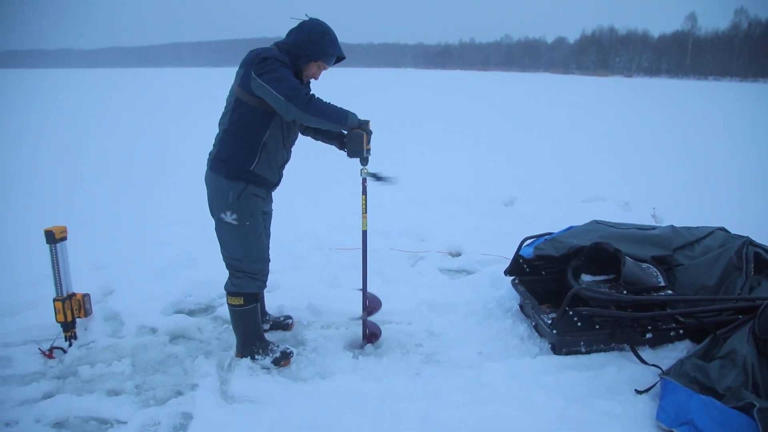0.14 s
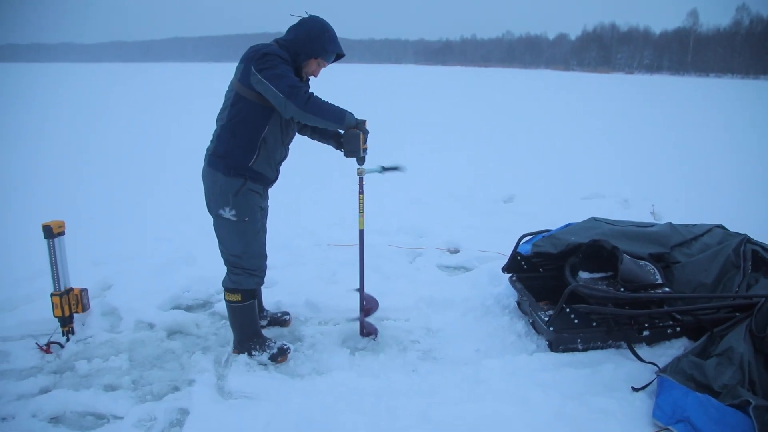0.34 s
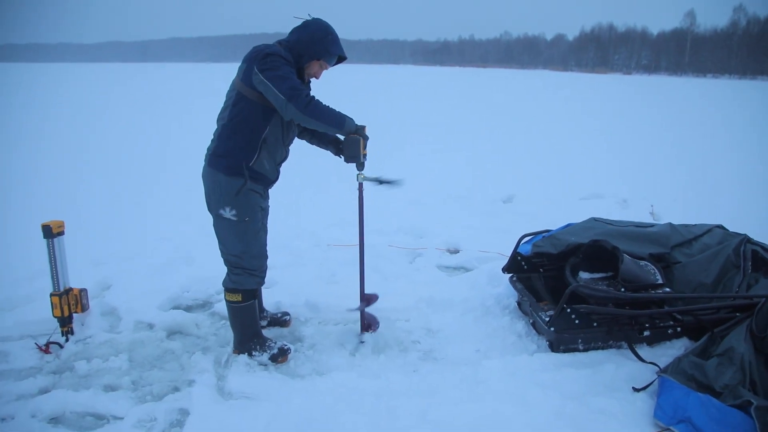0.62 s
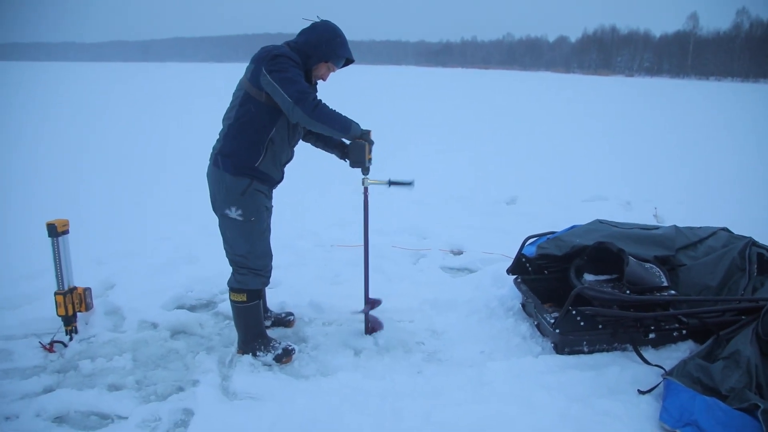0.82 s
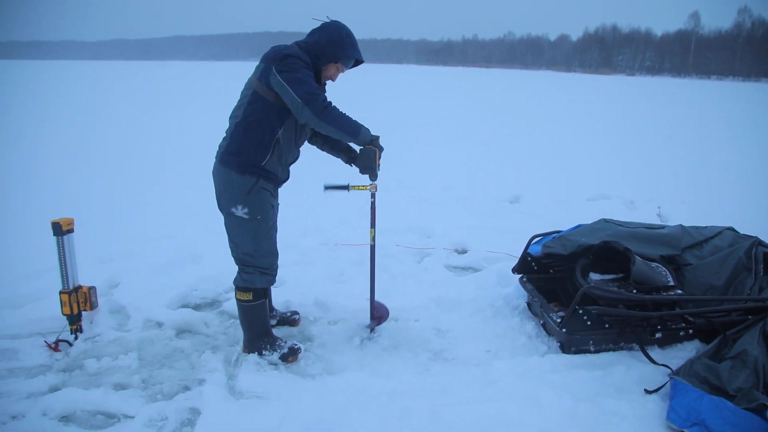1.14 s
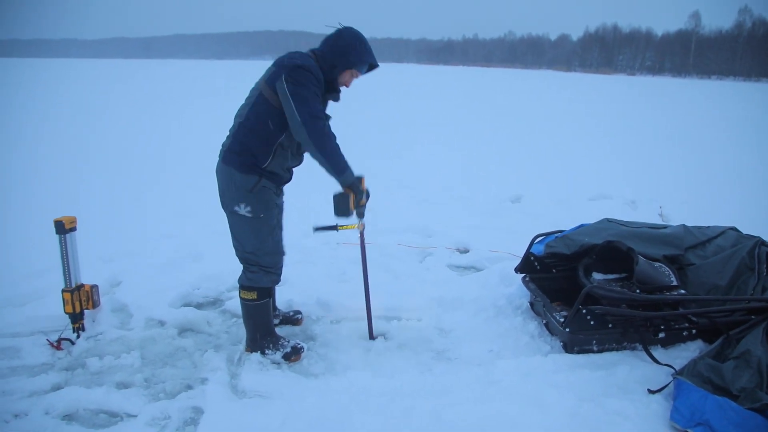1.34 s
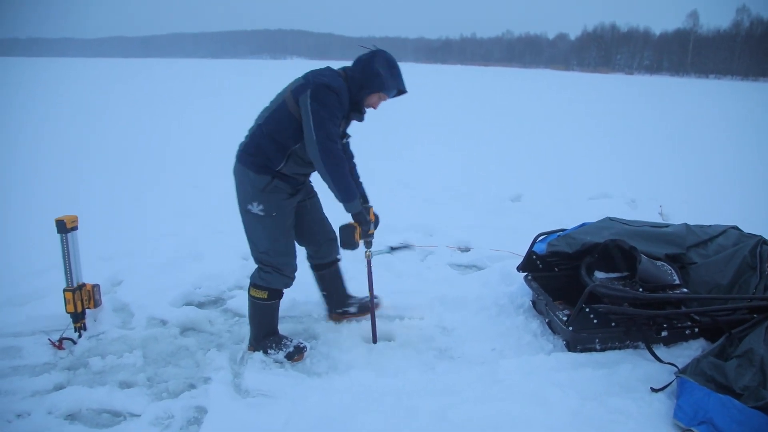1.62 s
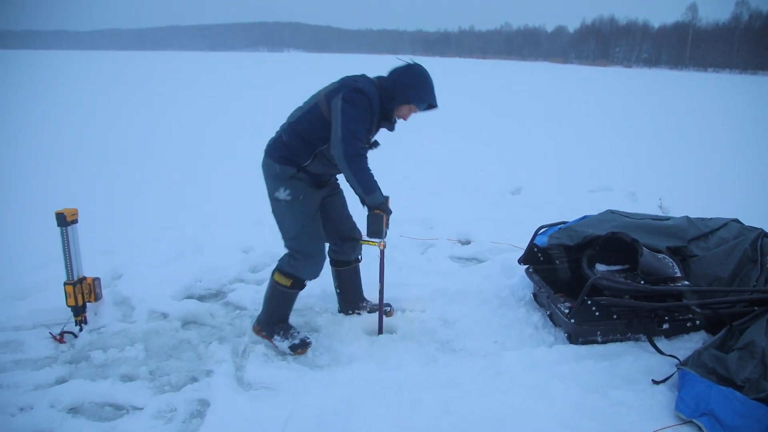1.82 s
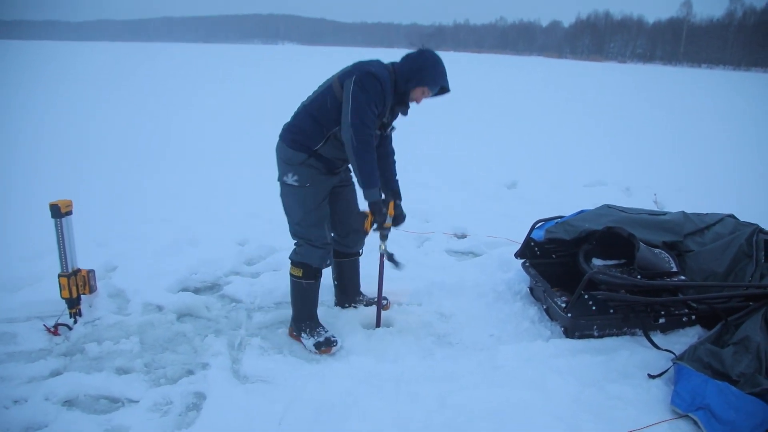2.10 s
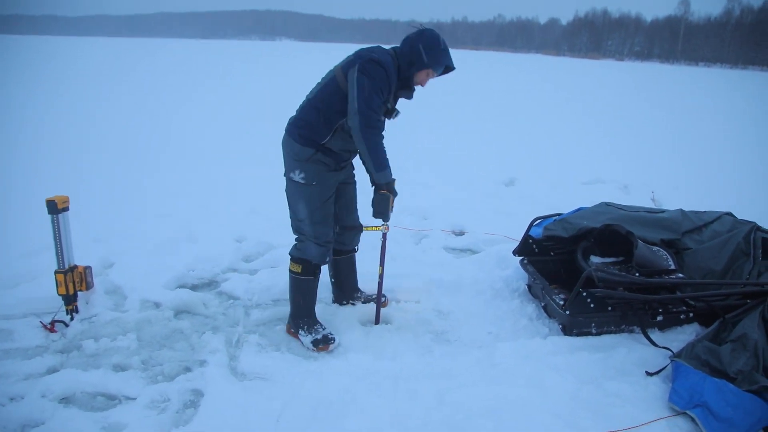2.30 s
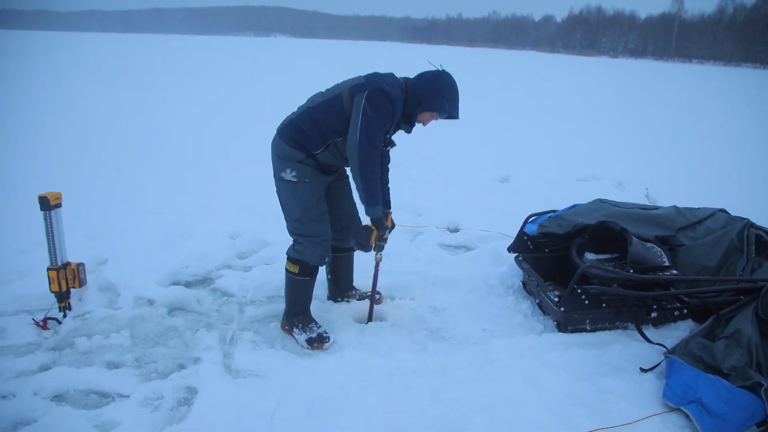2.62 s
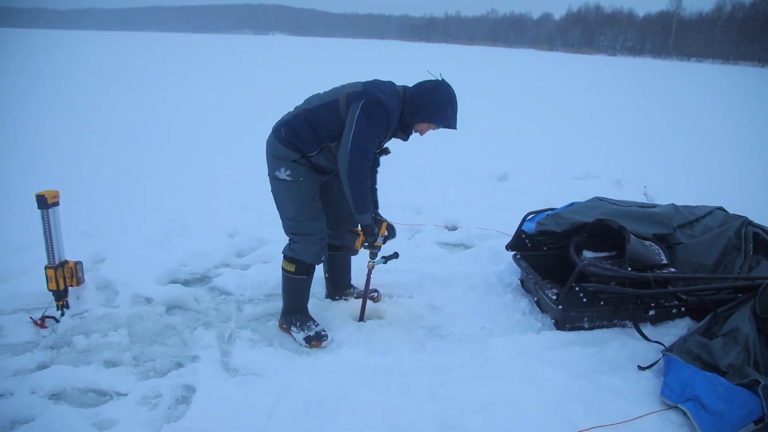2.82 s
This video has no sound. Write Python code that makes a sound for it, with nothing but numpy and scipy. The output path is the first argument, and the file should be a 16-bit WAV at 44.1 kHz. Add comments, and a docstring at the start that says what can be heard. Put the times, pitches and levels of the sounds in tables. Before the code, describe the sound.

A cordless drill grinds an ice auger into ice, stops, then knocks and snowy steps follow.

```python
"""Drilling lake ice

A cordless drill spins an ice auger on a frozen lake: the blades shave and grind under a wavering gear
whine. They lose their bite, and the auger swishes on briefly and stops. Then the shaft clacks, ticks and
rasps as it is worked in the hole, while boots shift, creak and crunch in packed snow."""
import sys
import numpy as np
from scipy import signal
from scipy.fft import rfft, irfft
from scipy.io import wavfile

SR = 44100
rng = np.random.default_rng(int(sys.argv[2]) if len(sys.argv) > 2 else 0)


def bounce(signal):
    """Save signal as a 16-bit WAV file at the path given by the first command-line argument."""
    frames = np.transpose(np.atleast_2d(signal))
    limited = np.clip(frames, -1, 1)
    pcm = np.round(limited * 32767).astype(np.int16)
    wavfile.write(sys.argv[1], SR, pcm)


N = 130095

# fader ride on the shaving hiss: (time [s], relative level [dB])
HISS_RIDE = [(0, -15), (.2, -16), (.3, -15.5), (.52, -14.5), (.545, -21.5), (.6, -17), (.65, -14.5),
             (.7, -17), (1.0, -16), (1.283, -15.5), (1.308, -25), (1.41, -24.5), (1.46, -23), (1.53, -23.5),
             (1.55, -26.5), (1.575, -35), (1.635, -51), (1.7, -50)]
# load on the blades, heard as grinding: (time [s], relative level [dB])
GRIND_RIDE = [(0, -26), (.1, -16), (.3, -17.5), (.45, -15), (.55, -12), (.57, -16.5), (.65, -15.5),
              (.8, -15.5), (1.0, -16), (1.04, -15.5), (1.2, -18.5), (1.3, -14), (1.345, -29), (1.395, -21),
              (1.44, -32), (1.53, -31.5), (1.62, -44), (1.68, -62)]
# tone of the bright hiss and of the darker grind: (frequency [Hz], relative level [dB])
HISS_EQ = [(650, -1), (1100, -1.5), (1270, -6), (1390, -4.5), (1680, -7.5), (2200, -3.5), (2400, -5),
           (3100, -8), (3750, -2.5), (4150, -2), (4960, -8.5), (5790, -4), (7080, -12), (8180, -4.5),
           (10000, -9.5), (14800, -0.5), (15800, -7.5)]
GRIND_EQ = [(15, -55), (25, -43), (50, -32), (100, -33), (160, -9), (230, -5), (290, -7.5), (400, -7),
            (520, -0.5), (700, 0.5), (900, 0.5), (1200, -6), (1700, -9), (3000, -30)]
# resonances of the auger: (frequency [Hz], bandwidth [Hz])
AUGER_MODES = [(376, 33.4), (690, 43), (838, 35)]
# their ring against the grind as the cut deepens: (time [s], first [dB], second [dB], third [dB])
AUGER_RING_RIDE = [(0, -5.5, -25, -27), (.3, -1, -12, -16), (.55, -7.5, -18, -9), (.8, -7, -5.5, 1),
                   (1.0, -1.5, -5, -9), (1.22, 1, -5, -8), (1.33, -10, -4, -6), (1.55, -40, -6, -14)]
CHIPS_PER_S, CHIP_SPREAD_DB, HISS_DB, HISS_FLUTTER_DB = 14000, 1, 2.5, 0.99
LUMPS_PER_S, LUMP_SPREAD_DB, GRIND_DB, GRIND_FLUTTER_DB = 1500, 1.7, -3, 0.9
AUGER_LOW_CUT_HZ, AUGER_STOP_S = 240, 1.72

# gear mesh rate, following the motor speed: (time [s], pitch [Hz])
GEAR_PITCH = [(0, 1900), (.07, 1760), (.115, 1887), (.3, 1825), (.37, 2040), (.46, 2108), (.63, 2240),
              (.81, 2100), (.9, 2194), (1.1, 2120), (1.18, 2210), (1.27, 2110), (1.33, 1850), (1.43, 1864),
              (1.5, 1830), (1.55, 1880)]
# harmonics of the whine as the load changes: (time [s], first [dB], second [dB], third [dB])
WHINE_RIDE = [(0, -45, -27, -36), (.15, -44, -27.5, -41), (.35, -34, -24, -43), (.48, -33, -37, -44),
              (1.0, -29, -42, -47), (1.26, -32, -43, -46), (1.335, -55, -44, -36), (1.48, -55, -36, -32),
              (1.53, -58, -38, -38), (1.58, -80, -60, -80)]
WHINE_JITTER, LOADED_JITTER, LOADED_S, GEAR_STOP_S = .005, .013, (.44, 1.3), 2

# tone of the outdoor bed: (frequency [Hz], relative level [dB])
AIR_EQ = [(30, -18), (86, -4), (170, -2), (280, 0), (500, -4), (1000, -8), (1500, -15.5), (3800, -16),
          (5500, -19), (8000, -20), (11000, -19), (13500, -17), (15700, -18)]
AIR_DB = -46

# clothing and loose snow stir as the auger is handled: (time [s], level [dB])
RUSTLE_RIDE = [(1.5, -45), (1.68, -46.5), (1.75, -41), (1.9, -42), (2.08, -41), (2.15, -53), (2.22, -44),
               (2.34, -42), (2.41, -54), (2.49, -45), (2.7, -47), (2.75, -47), (2.8, -58), (2.95, -68)]
# tone of the rustle: (frequency [Hz], relative level [dB])
RUSTLE_EQ = [(410, -37), (700, -8), (757, -14), (840, -8), (1430, -19), (3790, -16.5), (7160, -26),
             (15600, -19)]
RUSTLES_PER_S, RUSTLE_SPREAD_DB = 2800, 8

# the flights scrape the wall of the hole: (time [s], hold [s], level [dB])
RASP_CUES = [(1.28, 0.011, -12.5), (1.578, 0.0058, -18), (1.607, .002, -30.5), (1.845, 0.0012, -29),
             (1.861, .003, -47), (1.881, 0.0023, -38), (2.034, 0.0037, -26.5), (2.046, 0.0038, -23.5),
             (2.171, .003, -35), (2.2062, 0.0027, -24), (2.303, 0.011, -22), (2.463, 0.0034, -30),
             (2.5015, .003, -24.5)]
# tone of the scrape: (frequency [Hz], relative level [dB])
RASP_EQ = [(300, 1), (1000, -1.5), (2500, -3.5), (3700, 5), (5000, -3.5), (8000, -7), (15000, 1)]
RASP_RISE_S, RASP_RELEASE_S = 0.00061, 0.013

# snow or ice gives way: (time [s], envelope peak [dB], pitch [Hz])
JOLT_CUES = [(1.393, -12, 860), (1.933, -12.5, 263), (1.95, -12.5, 415), (1.979, -2.5, 605),
             (1.981, -9.5, 223), (2.019, -8, 370), (2.248, -14.5, 330), (2.262, -21, 530),
             (2.352, -33, 242), (2.593, -3, 523), (2.662, -10.5, 418)]
JOLT_RISE_CYCLES = 1.26

SHAFT_HZ, SHAFT_T60_S, SHAFT_DB = 265, 0.06, -38.5

# light metal ticks, and clacks as play in the chuck takes up: (time [s], strike level [dB])
TICK_CUES = [(1.5945, -15.5), (1.8432, -38), (1.9045, -15), (2.207, -27), (2.306, -20), (2.4228, -22.5)]
CLACK_CUES = [(1.8868, -12.5), (2.1695, -13), (2.4635, -12)]
# metal modes that each sets ringing: (frequency [Hz], gain [dB], 60 dB decay time [s])
TICK_RING = [(2200, -15, .004), (4000, -13, .006), (5950, -6, 0.013), (6280, -6.5, 0.013),
             (9500, -12, .003), (14500, -9, .004)]
CLACK_RING = [(286, -11.5, .03), (630, -10, 0.037), (866, -6, 0.02), (1064, -8, 0.028), (1333, -6, 0.017),
              (2520, -15, 0.01), (3500, -11, 0.0081), (3770, -15, 0.027), (4280, -16.5, .012),
              (10500, -24, 0.0055)]
CHATTER_GAIN, CHATTER_DECAY_S = .1, .0012

# boots press the snow: (time [s], rise [s], hold [s], crunch release [s], creak [dB], crunch [dB])
STEP_CUES = [(1.708, 0.0095, 0.019, 0.1, -34, -35.5), (1.782, 0.017, 0.017, .06, -45, -31),
             (1.838, 0.0074, 0.068, .08, -37.5, -35), (1.927, 0.0089, 0.084, 0.042, -19, -35),
             (2.076, 0.018, 0.016, .04, -38, -43.5), (2.164, 0.0031, 0.074, 0.064, -37.5, -42),
             (2.241, .012, 0.034, 0.072, -23, -29.5), (2.356, 0.0046, 0.0036, 0.026, -40, -39),
             (2.478, 0.057, 0.053, 0.025, -29.5, -36), (2.573, 0.013, 0.11, 0.052, -22, -33)]
# tone of the dull creak and of the crisp crunch: (frequency [Hz], relative level [dB])
CREAK_EQ = [(30, -44), (90, -29), (125, -14), (170, 3), (260, -3), (340, -1), (450, 1), (600, -6),
            (800, -9.5), (1200, -28), (2000, -28.5), (5000, -39.5)]
CRUNCH_EQ = [(530, -11.5), (900, -3), (1240, -5), (1780, -19), (2350, -14), (2910, -15.5), (3750, -10),
             (4330, -18.5), (5060, -19), (6280, -18.5), (8170, -21), (14400, -20.5), (15800, -32)]
SLIPS_PER_S, SLIP_SPREAD_DB, CREAK_RELEASE_RATIO = 700, 1.5, 1.15
CRYSTALS_PER_S, CRYSTAL_SPREAD_DB, CRUNCH_CLUMP_DB = 2500, 3, 2.5

# the last step groans, sinking as the weight settles: (time [s], pitch [Hz], level [dB])
GROAN_RIDE = [(2.52, 429.6, -60), (2.54, 438.5, -27.5), (2.6, 473, -25.5), (2.63, 382, -22),
              (2.66, 432, -18), (2.69, 408, -22.5), (2.712, 305, -25), (2.735, 274, -28.5),
              (2.755, 270, -44), (2.79, 270, -70)]
GROAN_JITTER, GROAN_FLUTTER_DB, GROAN_LOW_HZ, GROAN_LOW_DB = .11, 1.5, 180, -10.5

LOW_CUT_HZ, HIGH_CUT_HZ = 50, 15740
T = np.arange(N) / SR


def from_db(db):
    """Decibels to gain."""
    return 10 ** (np.asarray(db) / 20)


def unit_rms(x):
    """Scale to unit power."""
    return x / np.sqrt(np.mean(x ** 2) + 1e-20)


def ride(rows):
    """Turn breakpoints into one automation curve per value column."""
    times, *columns = np.transpose(rows)
    return [np.interp(T, times, column) for column in columns]


def drift(hz):
    """Smooth random wobble of unit power, mostly slower than hz."""
    pole = np.exp(-2 * np.pi * hz / SR)
    return unit_rms(signal.lfilter([1], [1, -2 * pole, pole * pole], rng.standard_normal(N + SR))[SR:])


def colour(x, eq):
    """Shape a steady texture with an EQ curve, at unit power."""
    hz, db = np.transpose(eq)
    bins_hz = np.maximum(np.fft.rfftfreq(N, 1 / SR), 1)
    gain = from_db(np.interp(np.log(bins_hz), np.log(hz), db))
    return unit_rms(irfft(rfft(x) * gain, N))


def grains(per_s, spread_db):
    """Tiny fractures: random clicks of uneven size."""
    sizes = from_db(spread_db * np.minimum(rng.exponential(1, N), 4))
    return (rng.random(N) < per_s / SR) * sizes * rng.choice([-1, 1], N)


def ring(x, hz, t60):
    """One resonance: a unit click starts a decaying sine of height 1."""
    radius, angle = from_db(-60 / (t60 * SR)), 2 * np.pi * hz / SR
    return signal.lfilter([0, np.sin(angle)], [1, -2 * radius * np.cos(angle), radius ** 2], x + 1e-18)


def envelope(start, rise, hold, release):
    """Linear rise, hold, then a fall of 30 dB per release time; all in seconds."""
    tail_db = -30 * np.maximum(T - start - rise - hold, 0) / release
    return np.clip((T - start) / rise, 0, 1) * from_db(tail_db)


def blades():
    """Fine chips hiss off the blades; coarser lumps grind and ring the auger."""
    (hiss_db,), (grind_db,) = ride(HISS_RIDE), ride(GRIND_RIDE)
    hiss = colour(grains(CHIPS_PER_S, CHIP_SPREAD_DB), HISS_EQ)
    grind = colour(grains(LUMPS_PER_S, LUMP_SPREAD_DB), GRIND_EQ)
    low_cut = signal.butter(2, AUGER_LOW_CUT_HZ, "high", fs=SR, output="sos")
    for (hz, width), db in zip(AUGER_MODES, ride(AUGER_RING_RIDE)):
        lumps = signal.sosfilt(low_cut, grains(LUMPS_PER_S, LUMP_SPREAD_DB))
        grind += from_db(db) * unit_rms(ring(lumps, hz, t60=np.log(1000) / (np.pi * width)))
    hiss *= from_db(HISS_DB + hiss_db + HISS_FLUTTER_DB * drift(hz=31))
    grind *= from_db(GRIND_DB + grind_db + GRIND_FLUTTER_DB * drift(hz=36))
    return (hiss + grind) * (T < AUGER_STOP_S)


def gears():
    """The gear mesh whines in three harmonics, wavering more while the blades cut deep."""
    hz, = ride(GEAR_PITCH)
    jitter = np.where((T > LOADED_S[0]) & (T < LOADED_S[1]), LOADED_JITTER, WHINE_JITTER)
    phase = 2 * np.pi * np.cumsum(hz * (1 + jitter * drift(hz=117))) / SR
    whine = sum(from_db(db) * unit_rms(np.sin(k * phase) * from_db(2.8 * drift(hz=35)))
                for k, db in enumerate(ride(WHINE_RIDE), 1))
    return whine * (T < GEAR_STOP_S)


def air():
    """A soft, steady bed of open air."""
    return from_db(AIR_DB) * colour(rng.standard_normal(N), AIR_EQ)


def rustle():
    """Cloth and loose snow crackle faintly, buried under the drill until it stops."""
    db, = ride(RUSTLE_RIDE)
    return from_db(db) * colour(grains(RUSTLES_PER_S, RUSTLE_SPREAD_DB), RUSTLE_EQ)


def rasps():
    """Short, bright scrapes of steel on ice."""
    grit = colour(grains(CHIPS_PER_S, CHIP_SPREAD_DB), RASP_EQ)
    return grit * sum(from_db(db) * envelope(start, RASP_RISE_S, hold, RASP_RELEASE_S)
                      for start, hold, db in RASP_CUES)


def jolts():
    """Snow or ice gives way in knocks that swell and die within a few cycles."""
    knocks = np.zeros(N)
    for start, db, hz in JOLT_CUES:
        cycles = np.maximum(T - start, 0) * hz
        age = cycles / JOLT_RISE_CYCLES
        swell = (age * np.exp(1 - age)) ** 2
        knocks += from_db(db) * swell * np.sin(2 * np.pi * cycles)
    return knocks


def shaft_hum():
    """As the auger runs out, the freed shaft bumps on the ice and hums in its lowest resonance."""
    bumps = colour(grains(LUMPS_PER_S, LUMP_SPREAD_DB), GRIND_EQ)
    hum = unit_rms(ring(bumps, SHAFT_HZ, SHAFT_T60_S))
    return from_db(SHAFT_DB) * envelope(start=1.42, rise=.12, hold=0.094, release=.07) * hum


def metal_hits(cues, modes):
    """Metal meets metal: a click and a brief chatter ring the modes."""
    force = np.zeros(N)
    for start, db in cues:
        force[int(start * SR)] += from_db(db)
        decay = (T > start) * np.exp(-np.abs(T - start) / CHATTER_DECAY_S)
        force += from_db(db) * CHATTER_GAIN * rng.standard_normal(N) * decay
    return sum((-1) ** k * from_db(db) * ring(force, hz, t60) for k, (hz, db, t60) in enumerate(modes))


def boots():
    """Packed snow slips under the sole in a dull creak while its crystals crunch in clumps."""
    creak = colour(grains(SLIPS_PER_S, SLIP_SPREAD_DB), CREAK_EQ)
    crystals = grains(CRYSTALS_PER_S, CRYSTAL_SPREAD_DB)
    crunch = colour(crystals * from_db(CRUNCH_CLUMP_DB * drift(hz=90)), CRUNCH_EQ)
    return sum(from_db(creak_db) * envelope(start, rise, hold, release * CREAK_RELEASE_RATIO) * creak
               + from_db(crunch_db) * envelope(start, rise, hold, release) * crunch
               for start, rise, hold, release, creak_db, crunch_db in STEP_CUES)


def groan():
    """Snow sticks and slips almost regularly under a twisting sole: a rough, sinking tone over a low one."""
    hz, db = ride(GROAN_RIDE)
    tones = []
    for pitch in (hz, GROAN_LOW_HZ):
        phase = 2 * np.pi * np.cumsum(pitch * (1 + GROAN_JITTER * drift(hz=94))) / SR
        tones.append(np.sin(phase) * from_db(GROAN_FLUTTER_DB * drift(hz=70)))
    upper, lower = tones
    gate = (T > GROAN_RIDE[0][0]) & (T < GROAN_RIDE[-1][0])
    return from_db(db) * unit_rms(upper + from_db(GROAN_LOW_DB) * lower) * gate


def scene():
    """The mix: dry open air, with every layer in the centre."""
    bed = air()
    handling = metal_hits(CLACK_CUES, CLACK_RING) + metal_hits(TICK_CUES, TICK_RING) + rasps() + rustle()
    drilling = blades() + gears() + shaft_hum()
    snow = boots() + jolts() + groan()
    mono = drilling + snow + handling + bed
    return np.array([mono, mono])


def record(dry):
    """Master chain: thin the deep bass, clip peaks near full scale, cut the top steeply."""
    low_cut = signal.butter(2, LOW_CUT_HZ, "high", fs=SR, output="sos")
    high_cut = signal.ellip(14, .1, 80, HIGH_CUT_HZ, fs=SR, output="sos")
    clipped = np.clip(signal.sosfilt(low_cut, dry), -.9, .9)
    return signal.sosfilt(high_cut, clipped)


dry = scene()
out = record(dry)
bounce(out)
```